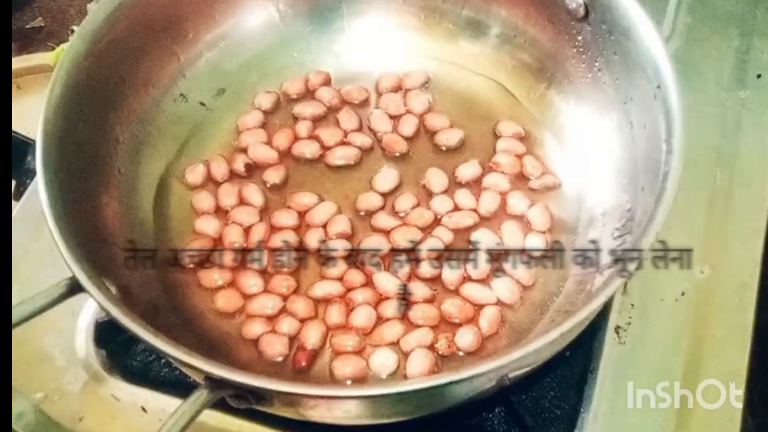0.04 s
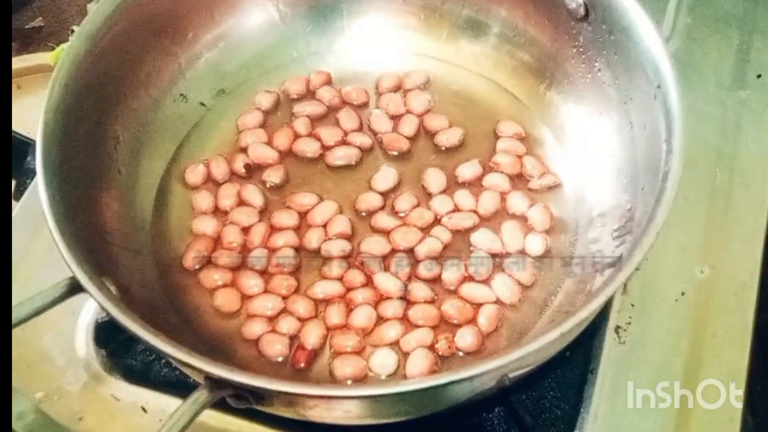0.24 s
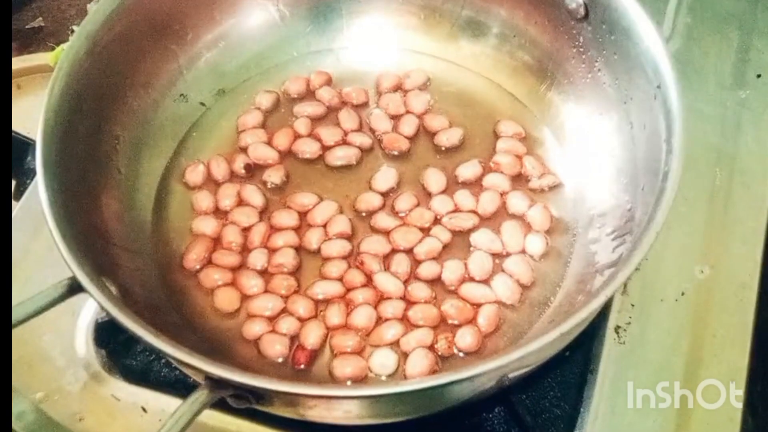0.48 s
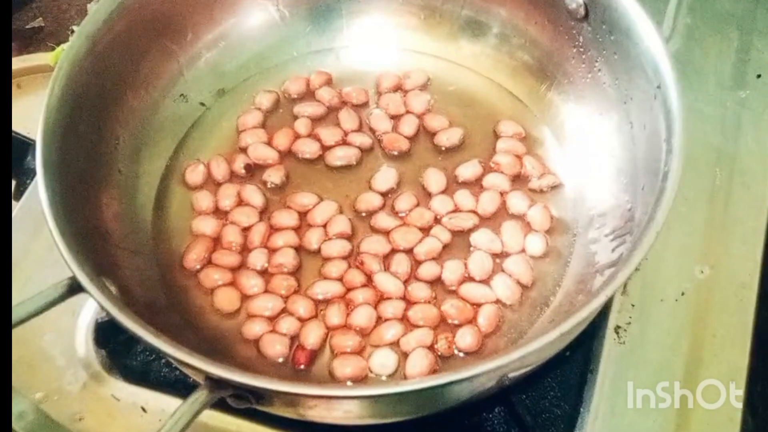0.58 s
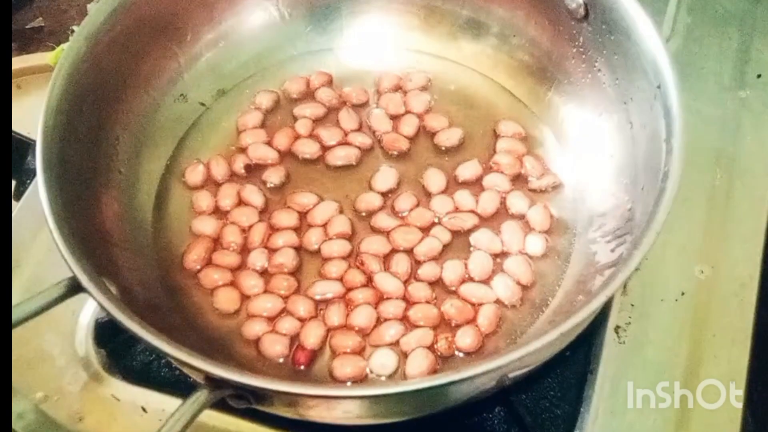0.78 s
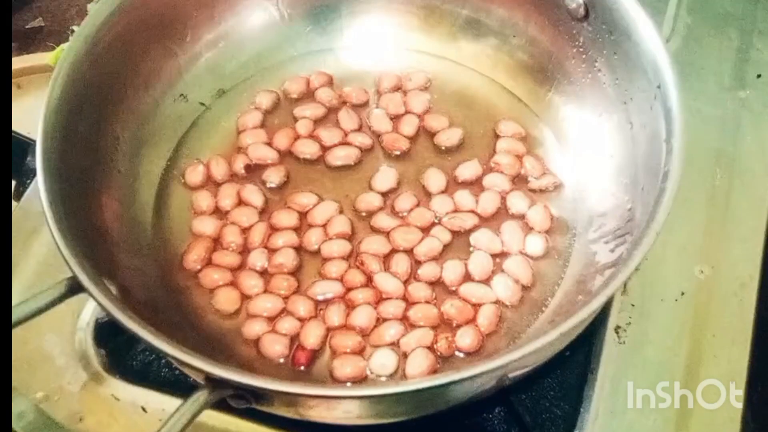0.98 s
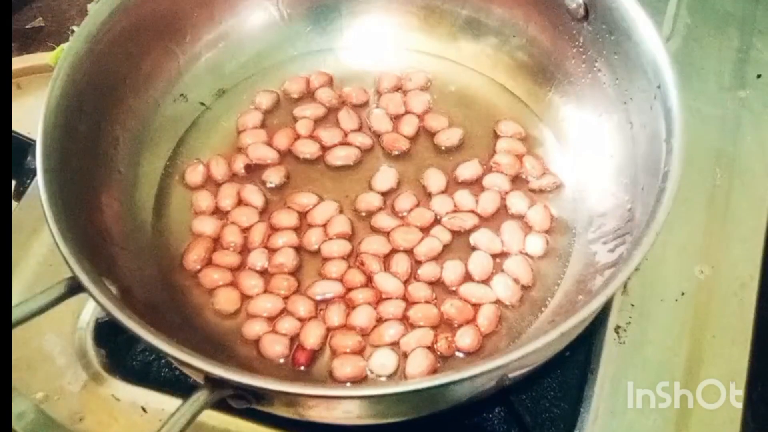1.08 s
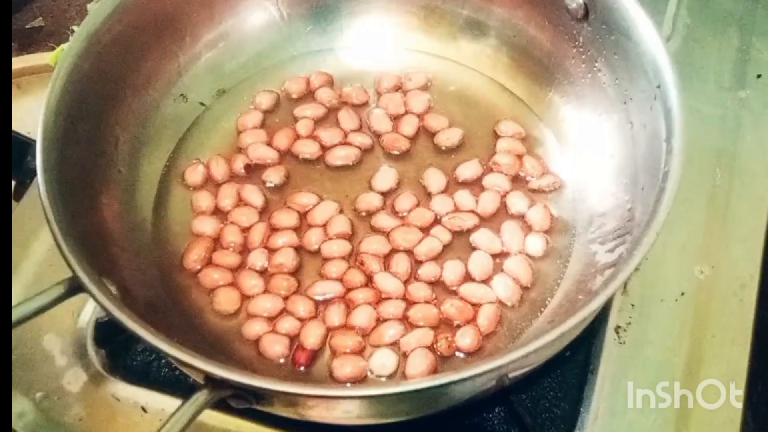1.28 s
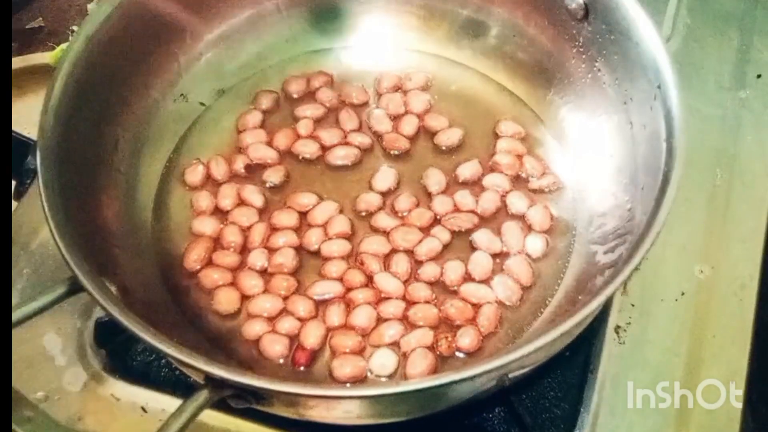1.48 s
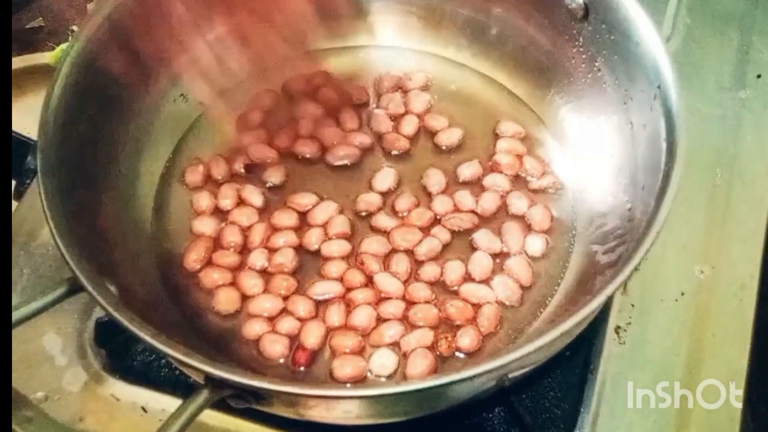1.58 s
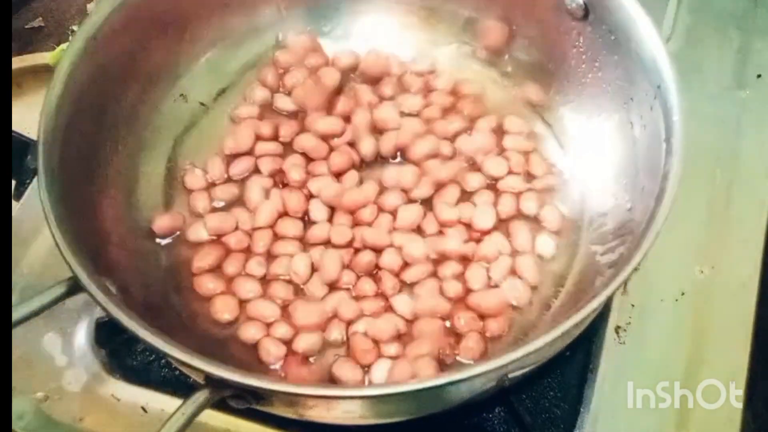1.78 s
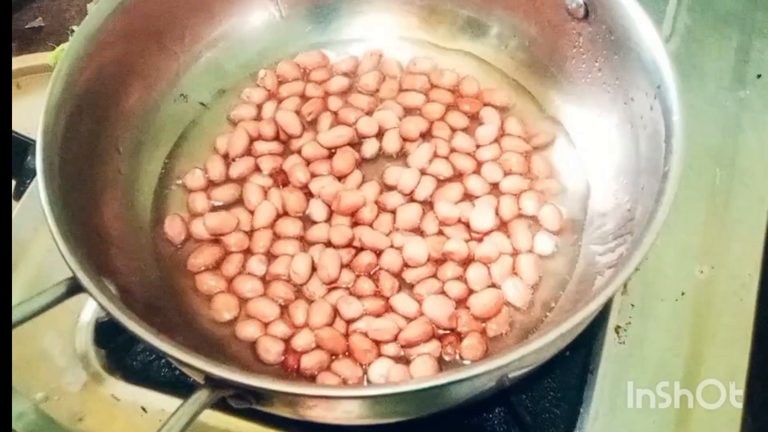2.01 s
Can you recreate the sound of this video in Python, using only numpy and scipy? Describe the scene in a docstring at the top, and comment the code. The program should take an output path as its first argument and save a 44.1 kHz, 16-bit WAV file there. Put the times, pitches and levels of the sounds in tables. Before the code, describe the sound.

Raw peanuts clatter onto steel, close by in a small kitchen. After a faint ting and soft rustle, they pour from a jar into a small bowl from 0.2 to 1.2 seconds, clicking rapidly. The last nuts knock hollowly in the jar until 1.5 seconds, and a few stragglers click. Around 1.7 seconds the bowlful showers into a pan, which rings lightly as they settle by 2 seconds.

```python
"""A faint ting and a rustle: raw peanuts slide from a jar and clatter into a small steel bowl.
The jar knocks hollowly as it empties, a few stragglers click, then the bowlful is tipped into a
steel pan, which rings as the nuts settle. Each impact gives a broadband tick and excites the damped
modes of the thing struck; friction of the skins sets the air in the jar resonating.
All is heard from close by in a small kitchen."""
import sys
import numpy as np
from scipy import signal
from scipy.fft import rfft, irfft
from scipy.io import wavfile

SR = 44100
rng = np.random.default_rng(int(sys.argv[2]) if len(sys.argv) > 2 else 0)


def bounce(signal):
    """Save signal as a 16-bit WAV file at the path given by the first command-line argument."""
    frames = np.transpose(np.atleast_2d(signal))
    limited = np.clip(frames, -1, 1)
    pcm = np.round(limited * 32767).astype(np.int16)
    wavfile.write(sys.argv[1], SR, pcm)


N = 90404

# nuts landing in the bowl: time_s, tick_db, clack_db
BOWL_HITS = [(0.2249, -25, -23), (0.2405, -26, -18.5), (0.251, -32, -46), (0.2565, -54, -24),
             (0.271, -26.5, -17.5), (0.3125, -27, -20), (0.326, -25, -17.5), (0.3359, -31, -28),
             (0.3502, -38, -34), (0.3621, -19.5, -28), (0.3655, -24.5, -22), (0.3735, -42, -25),
             (0.3831, -32, -22), (0.3902, -28.5, -38), (0.4053, -35, -29), (0.4099, -21.5, -23),
             (0.416, -30.5, -21), (0.4352, -32, -28), (0.4424, -22.5, -19.5), (0.468, -27, -23),
             (0.4906, -26.5, -37), (0.495, -31, -24), (0.5126, -34, -34), (0.5373, -40, -20.5),
             (0.5463, -29.5, -24.5), (0.5747, -48, -25), (0.5838, -42, -22.5), (0.5932, -32.5, -27),
             (0.6153, -37, -32), (0.626, -28.5, -31), (0.6478, -30.5, -21.5), (0.6633, -33, -20),
             (0.6799, -23.5, -21), (0.6875, -35.5, -22), (0.7142, -34, -38), (0.7324, -67, -25),
             (0.7463, -39.5, -26), (0.7694, -27.5, -27.5), (0.7804, -25.5, -27), (0.8339, -25.5, -22.5),
             (0.8575, -31, -24.5), (0.866, -31, -25.5), (0.873, -19, -21), (0.9142, -26.5, -33),
             (0.9284, -32, -24.5), (0.938, -22, -22.5), (0.9498, -27, -50), (0.9605, -36, -32.5),
             (0.9669, -23, -32), (0.978, -30, -25.5), (1.0005, -26, -24), (1.0154, -22.5, -24),
             (1.0462, -26.5, -26), (1.0581, -25, -23.5), (1.0834, -27, -27.5), (1.094, -32, -31),
             (1.1021, -31.5, -25), (1.1109, -28, -32), (1.1438, -34.5, -30.5), (1.1795, -29.5, -29)]
TICK_T60_S, RING_WINDOW_S = .0065, .006


def bowl():
    """Impact excitation: falling nuts sound the bowl's modes and bounce on each other."""
    modes = [(451, -19.5, 0.1), (729, -3, 0.041), (1048, -4.5, 0.04), (1402, -13.5, 0.22),
             (1492, -6, 0.038), (1960, -5.5, .018), (2102, 2.5, 0.027), (2187, -12.5, 0.11),
             (2440, -11, 0.045)]  # bowl resonances: pitch_hz, level_db, t60_s
    spectrum = [(80, -43.5), (200, -14), (400, -6.5), (900, 4), (2800, 1), (4500, 0), (5500, -10.5),
                (6600, -16.5), (7800, -16), (9300, -31), (11300, -35.5), (13000, -28.5), (16000, -40)]  # contact spectrum: frequency_hz, level_db
    levels = [(.14, -77), (.17, -49), (.225, -70), (.25, -41.5), (.42, -36), (.52, -40), (.62, -45.5),
              (.69, -39.5), (.76, -48), (.87, -33.5), (.9, -45), (.97, -41), (1.1, -54.5), (1.2, -46.5),
              (1.4, -54), (1.5, -84)]  # envelope of the lesser contacts: time_s, level_db
    hits = clacks(gain_db=-6) + strikes(BOWL_HITS, modes, spectrum, tick_db=1.5, ring_db=-6.5)
    return hits + rattle(levels, modes, spectrum, per_s=260, scatter_db=3, tick_db=3.5, ring_db=0)


def clacks(gain_db):
    """Transient response: the bowl's wall clacks under each nut, higher in pitch as the bowl fills."""
    pitches = [(.22, 1334), (.6, 1410), (1.1, 1515)]  # rise of the clack: time_s, pitch_hz
    out = np.zeros(N)
    for at, _, db in BOWL_HITS:
        hz = curve(pitches, at) * (1 + .03 * rng.standard_normal())
        add(out, at, undb(db + gain_db) * swell(hz, peak_s=.0027))
    return out


def jar():
    """Cavity resonance: the last nuts knock hollowly in a jar too small to radiate bass."""
    knocks = [(1.1615, -28, -18.5, 713), (1.1692, -57, -20.5, 736), (1.2417, -34, -16.5, 718),
              (1.2586, -17, -68, 580), (1.2774, -29, -25, 694), (1.2805, -26, -20, 646),
              (1.286, -33, -19.5, 743), (1.2994, -29.5, -19.5, 792), (1.3098, -25, -16, 750),
              (1.3172, -29.5, -18, 765), (1.3378, -40, -16.5, 738), (1.3485, -27, -46, 698),
              (1.3625, -31, -40, 720), (1.3745, -40, -21.5, 722), (1.3825, -35, -18.5, 780),
              (1.4121, -31, -45, 790), (1.4233, -31.5, -17.5, 783), (1.4425, -44, -29, 820),
              (1.4505, -56, -33, 720), (1.467, -53, -30, 830), (1.5451, -32.5, -65, 790),
              (1.5683, -49, -64, 770), (1.5867, -26.5, -35, 800), (1.6332, -36, -70, 800),
              (1.6555, -39, -57, 800), (1.6722, -52, -56, 800)]  # nuts striking the wall: time_s, tick_db, knock_db, cavity_hz
    modes = [(1, 1.5, 0.069), (.82, -11, 0.035), (1.68, -3, 0.042), (2.6, 8, 0.01), (2.76, 1.5, 0.023),
             (3.2, -1.5, 0.025), (4.4, -10, 0.025)]  # jar resonances: ratio_to_cavity_pitch, level_db, t60_s
    spectrum = [(80, -95), (300, -15), (900, 10), (2400, -2.5), (3300, 2.5), (4400, -1), (5500, -14),
                (7800, -21.5), (9500, -42), (13000, -40.5), (16000, -45)]  # contact spectrum: frequency_hz, level_db
    levels = [(1.1, -51), (1.17, -38), (1.22, -52), (1.3, -44.5), (1.44, -39.5), (1.5, -49.5), (1.56, -57)]  # envelope of the tumbling: time_s, level_db
    hits = strikes(knocks, modes, spectrum, tick_db=.5, ring_db=-9)
    for at, _, db, hz in knocks:
        add(hits, at, undb(db) * swell(hz, peak_s=.0024))
    tumble = rattle(levels, modes, spectrum, per_s=300, scatter_db=4, tick_db=0, ring_db=1, pitch=720)
    return butterworth(hits + tumble + sliding(), 464, "high")


def pan():
    """Free vibration: the bowlful showers onto steel, whose lightly damped modes ring on."""
    hits = [(1.6948, -31.5, -32), (1.6998, -59, -25.5), (1.7052, -40, -26.5), (1.7293, -45, -30),
            (1.7372, -30, -18.5), (1.7485, -45, -60), (1.7518, -26, -31), (1.762, -55, -28),
            (1.7715, -28, -37), (1.7895, -34.5, -39), (1.8006, -35, -63.5), (1.8121, -30, -61),
            (1.8873, -37.5, -63)]  # distinct impacts: time_s, tick_db, ring_db
    modes = [(800, -15, .03), (1186, -11, 0.59), (1123, -9, 0.046), (1410, -22, 0.91), (1520, 8.5, 0.028),
             (1600, -36, 0.14), (1719, -13, .2), (1978, -31.5, 1.5), (2190, 14.5, 0.02), (2350, 4, 0.037),
             (2647, -6, 0.17), (3260, -6, 0.19), (3444, -20.5, 0.6), (3600, -18, 0.099), (4040, -27, 0.6)]  # pan resonances: pitch_hz, level_db, t60_s
    spectrum = [(60, -18), (200, -7), (700, -6), (1500, 2.5), (3000, -3.5), (4300, 0), (5200, -7.5),
                (7800, -9.5), (9400, -24.5), (11300, -25.5), (12600, -20), (16000, -25)]  # contact spectrum: frequency_hz, level_db
    levels = [(1.54, -55), (1.62, -46.5), (1.685, -52), (1.705, -44), (1.725, -33.5), (1.742, -32.5),
              (1.765, -34.5), (1.785, -48), (1.82, -40), (1.86, -53.5), (1.9, -54.5), (1.95, -58.5),
              (1.97, -79)]  # envelope of the shower: time_s, level_db
    shower = rattle(levels, modes, spectrum, per_s=1500, scatter_db=3.5, tick_db=2, ring_db=-.5)
    return strikes(hits, modes, spectrum, tick_db=1, ring_db=-3.5) + shower


def strikes(hits, modes, spectrum, tick_db, ring_db):
    """Superposition: each nut adds a tick and the ring of the thing it hits."""
    ticks, rings = np.zeros((2, N))
    tick_cap_db = -23.5
    for at, crack_db, body_db, *pitch in hits:
        add(ticks, at, undb(min(crack_db, tick_cap_db) + tick_db) * tick())
        add(rings, at, undb(body_db + ring_db) * ring(modes, *pitch))
    return colour(ticks, spectrum) + rings


def tick(size=1024):
    """A brief contact is broadband: a snap and burst, brighter for a hard landing, then a dull tail."""
    t = np.arange(size) / SR
    snap = undb(9) * (t == 0)
    burst = snap + rng.standard_normal(size) * fade(t, TICK_T60_S)
    dull = butterworth(burst, 6000, "low", order=1)
    hardness = undb(3.5 * np.clip(rng.standard_normal(), -2, 1))
    tail = butterworth(rng.standard_normal(size), 6000, "low", order=1) * undb(-5.5) * fade(t, .03)
    return (dull + hardness * (burst - dull) + tail) / (2 * rms(dull, seconds=.003))


def ring(modes, pitch=1, size=11000):
    """Modal summation: where the nut lands sets the strength and sign of each decaying mode."""
    t = np.arange(size) / SR
    hz, db, t60 = np.array(modes, float).T[:, :, None]
    scatter, detune, side = rng.standard_normal((3, len(modes), 1))
    waves = np.sin(2 * np.pi * pitch * hz * (1 + .008 * detune) * t) * fade(t, t60)
    shares = np.sign(side) * undb(db + 3 * scatter)
    sound = (shares * waves).sum(0) * (1 - np.exp(-t / .0015))
    return sound / rms(sound, RING_WINDOW_S)


def swell(hz, peak_s, size=1500):
    """Damped oscillation of a wall pushed by a nut: a few cycles grow to a peak and die away."""
    t = np.arange(size) / SR
    sound = np.sin(2 * np.pi * hz * t) * (t * np.exp(-t / peak_s)) ** 2
    return sound / rms(sound, RING_WINDOW_S)


def rattle(levels, modes, spectrum, per_s, scatter_db, tick_db, ring_db, pitch=1, size=16000):
    """Incoherent addition: a crowd of lesser contacts, each with its own share of every mode."""
    t = np.arange(N) / SR
    active = (t >= levels[0][0]) * (t <= levels[-1][0])
    hits = contacts(per_s, scatter_db) * undb(curve(levels, t)) * active
    responses = [damped_sine(t[:size], hz * pitch, db, t60) for hz, db, t60 in modes]
    rings = sum(signal.fftconvolve(hits * rng.standard_normal(N), mode)[:N] for mode in responses)
    rings /= np.linalg.norm(responses)
    # overlapping ticks add in power
    tick_power = fade(t[:size], TICK_T60_S) ** 2
    power = np.abs(signal.fftconvolve(hits ** 2, tick_power / tick_power.sum())[:N])
    ticks = colour(np.sqrt(power) * rng.standard_normal(N), spectrum)
    return undb(ring_db) * rings + undb(tick_db) * ticks


def contacts(per_s, scatter_db):
    """A Poisson process: random impulses of uneven strength, rms 1."""
    occurs = rng.random(N) < per_s / SR
    impulses = occurs * undb(scatter_db * np.clip(rng.standard_normal(N), -2, 1.5))
    return impulses / rms(impulses)


def sliding(size=6000):
    """Friction noise: skins rub along the jar and drive its cavity into a hum."""
    rub_levels = [(0, -67), (.04, -63), (.09, -57), (.125, -59.5), (.155, -51), (.17, -48.5), (.22, -48),
                  (.3, -52), (1.6, -66), (2.04, -68)]  # envelope of the rubbing: time_s, level_db
    rub_spectrum = [(200, -3), (1000, -5), (1500, 3), (2500, -9), (3100, -6.5), (3500, -4), (4400, 0),
                    (5200, -8), (6800, -22), (8000, -13.5), (10000, -31), (15000, -26)]  # friction spectrum: frequency_hz, level_db
    hum_levels = [(0, -70), (.04, -52), (.1, -51.5), (.2, -54), (.4, -44.5), (1.12, -46.5), (1.2, -36),
                  (1.45, -33.5), (1.52, -52.5), (1.6, -62.5), (1.96, -117.5), (2.035, -56)]  # envelope of the hum: time_s, level_db
    air_modes = [(733, -10, 0.046), (764.2, -1, 0.049), (1457, -20, 0.045)]  # cavity resonances: pitch_hz, level_db, t60_s
    t = np.arange(N) / SR
    grains = contacts(per_s=2500, scatter_db=2.8) * rng.standard_normal(N)
    rub = colour(grains, rub_spectrum) * undb(curve(rub_levels, t))
    build_up = 1 - fade(t[:size], .043)
    cavity = sum(damped_sine(t[:size], *mode) for mode in air_modes) * build_up
    hum = signal.fftconvolve(grains, cavity)[:N]
    return rub + hum / rms(hum) * undb(curve(hum_levels, t))


def bumps(size=12000):
    """Single damped modes: a faint ting, then dull thuds, from the things being handled."""
    handling = [(.002, 1484, -52.5, .22), (0.649, 266, -28, 0.028), (0.68, 240, -26.5, 0.034),
                (0.697, 169, -32.5, 0.16), (0.723, 126, -36.5, 0.11), (1.767, 131, -45.5, 0.29),
                (1.789, 196.4, -46, .2)]  # soft blows: start_s, pitch_hz, level_db, t60_s
    out, t = np.zeros(N), np.arange(size) / SR
    attack = 1 - np.exp(-t / .00077)
    for at, hz, db, t60 in handling:
        add(out, at, damped_sine(t, hz, db, t60) * attack)
    return out


def kitchen(direct, level_db=-7, t60_s=.19, gap_s=.0088, size=22000):
    """Reverberation: short, dense reflections from counter and walls follow the direct sound."""
    spectrum = [(100, -14.5), (700, 0.5), (2000, -0.5), (5000, -9.5), (14000, 1.5)]  # spectrum of the reflections: frequency_hz, level_db
    t = np.arange(size) / SR
    tail = colour(rng.standard_normal(size), spectrum) * fade(t, t60_s) * (t > gap_s)
    return direct + undb(level_db) * signal.fftconvolve(direct, tail / np.linalg.norm(tail))[:N]


def room_noise():
    """Stationary noise: a faint rumble and hiss."""
    spectrum = [(25, 8), (60, 6), (150, 0.5), (350, -2.5), (1000, -30), (2000, -10), (5000, -31),
                (8000, -12.5), (10000, -26.5), (16000, -20)]  # background spectrum: frequency_hz, level_db
    return undb(-68) * colour(rng.standard_normal(N), spectrum)


def undb(db):
    """Decibels to amplitude ratio."""
    return 10 ** (np.asarray(db) / 20)


def curve(rows, t):
    """Linear interpolation between the rows of a table."""
    return np.interp(t, *np.array(rows, float).T)


def rms(x, seconds=N / SR):
    """Root mean square over the opening seconds, by default the whole scene."""
    return np.sqrt(np.mean(x[:int(seconds * SR)] ** 2))


def fade(t, t60):
    """Exponential decay, 60 dB in t60 seconds."""
    return np.exp(-np.log(1000) * t / t60)


def damped_sine(t, hz, db, t60):
    """Impulse response of one mode."""
    return undb(db) * np.sin(2 * np.pi * hz * t) * fade(t, t60)


def colour(x, spectrum, size=2048):
    """Minimum-phase filter through (Hz, dB) points that keeps the power of white noise."""
    hz, db = np.array(spectrum, float).T
    bins_hz = np.arange(size // 2 + 1) * SR / size
    gain = undb(np.interp(np.log(bins_hz + 1), np.log(hz), db))
    cepstrum = irfft(np.log(gain / np.sqrt(np.mean(gain ** 2))))
    # folding the cepstrum makes the filter causal
    cepstrum[1:size // 2] *= 2
    cepstrum[size // 2 + 1:] = 0
    return signal.fftconvolve(x, irfft(np.exp(rfft(cepstrum))))[:len(x)]


def butterworth(x, hz, kind, order=2):
    """Maximally flat low-pass or high-pass filter."""
    return signal.sosfilt(signal.butter(order, hz, kind, fs=SR, output="sos"), x)


def add(out, at, sound):
    """Mix a sound in at a time in seconds."""
    i = int(np.clip(at * SR, 0, N - 1))
    out[i:i + len(sound)] += sound[:N - i]


def scene():
    """Superposition of bowl, jar, pan and bumps in the kitchen, over its background noise."""
    return (kitchen(bowl() + jar() + pan() + bumps()) + room_noise())[None]


def record(dry, low_cut_hz=285, ceiling=.4, top_hz=15950):
    """Band limiting and soft saturation: thin the bass, round the highest peaks, cut the top."""
    thin = butterworth(dry, low_cut_hz, "high", order=1)
    rounded = thin / (1 + (thin / ceiling) ** 6) ** (1 / 6)
    return signal.sosfilt(signal.ellip(10, .2, 80, top_hz, fs=SR, output="sos"), rounded)


dry = scene()
out = record(dry)
bounce(out)
```